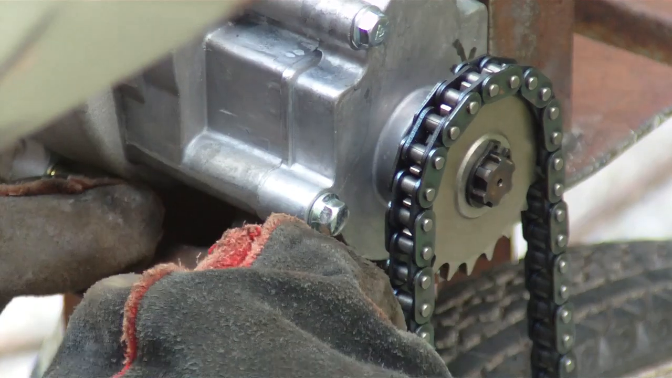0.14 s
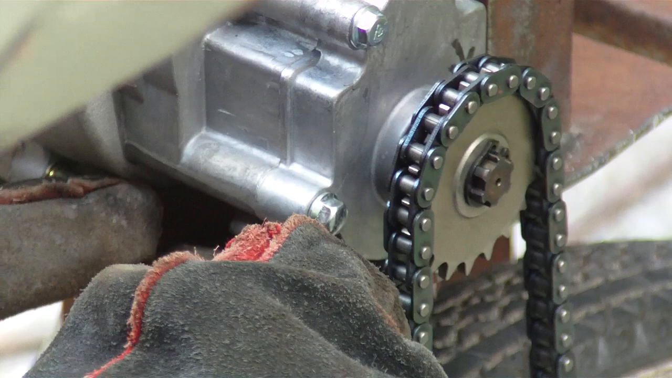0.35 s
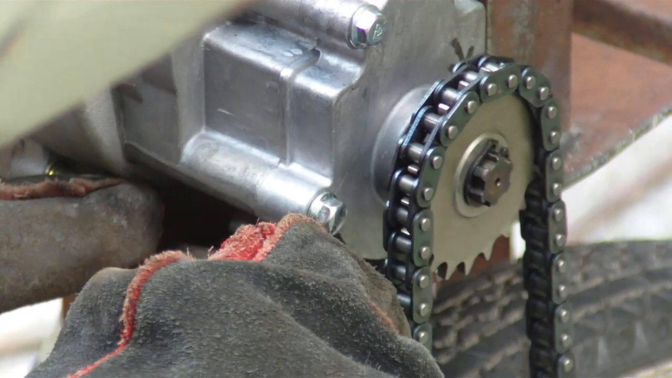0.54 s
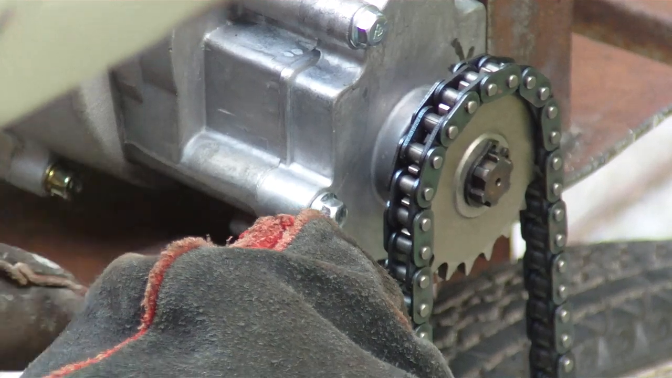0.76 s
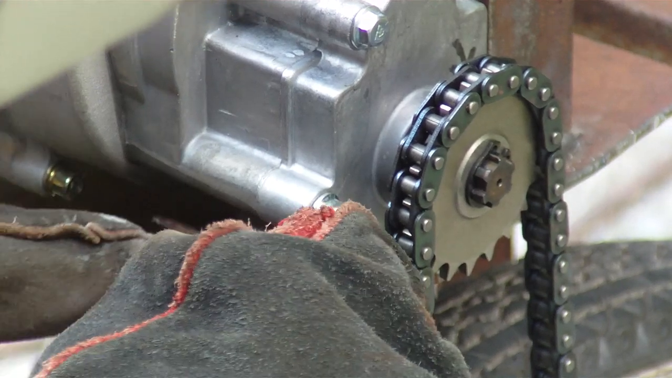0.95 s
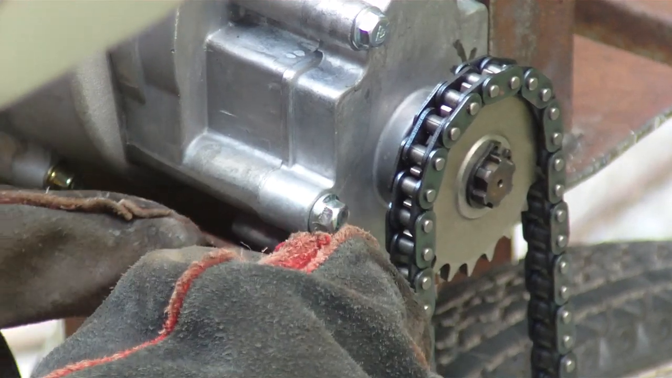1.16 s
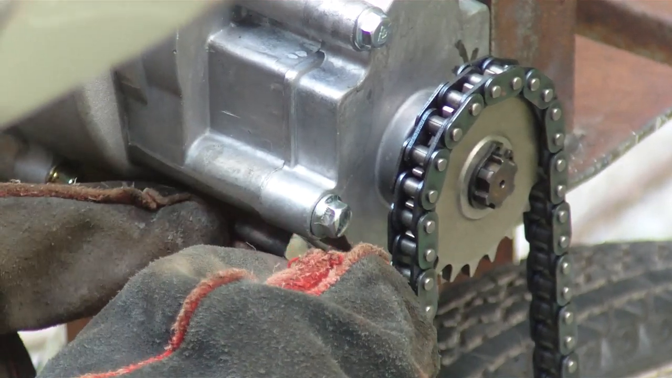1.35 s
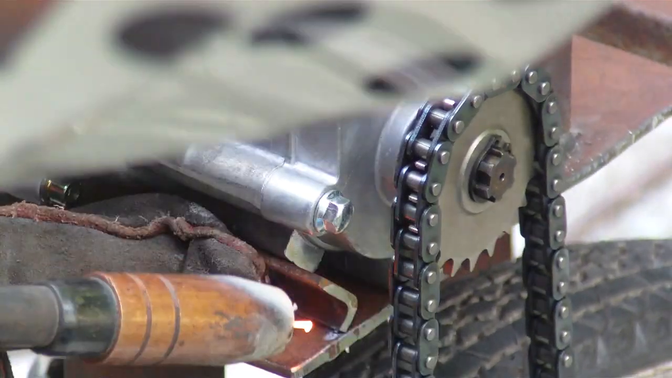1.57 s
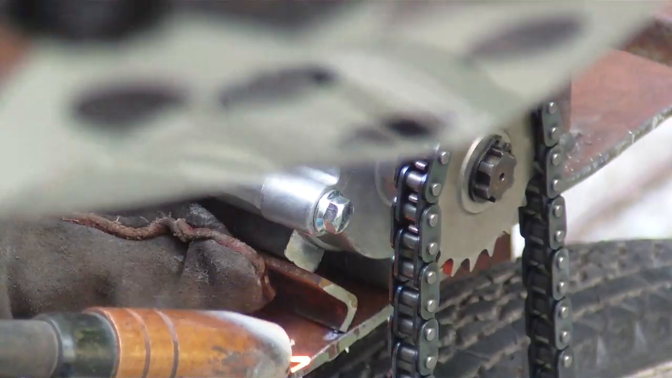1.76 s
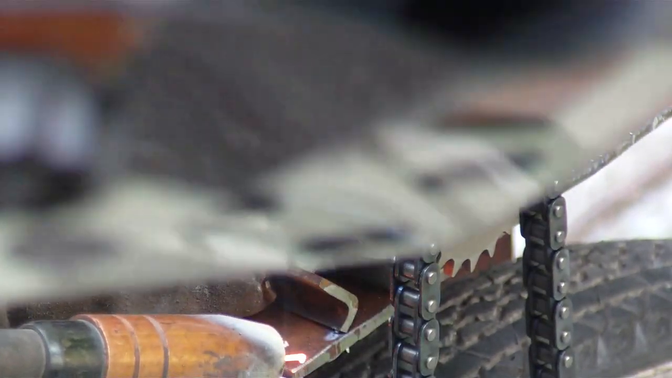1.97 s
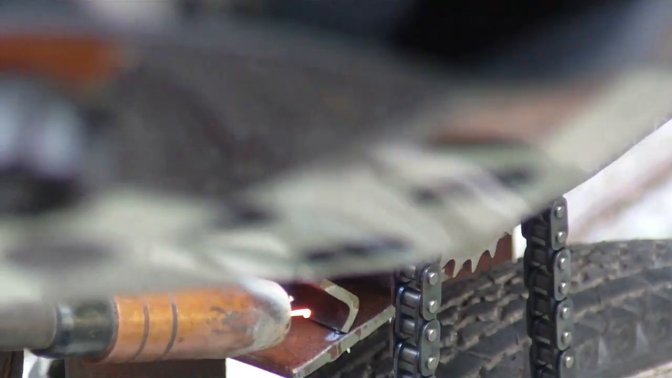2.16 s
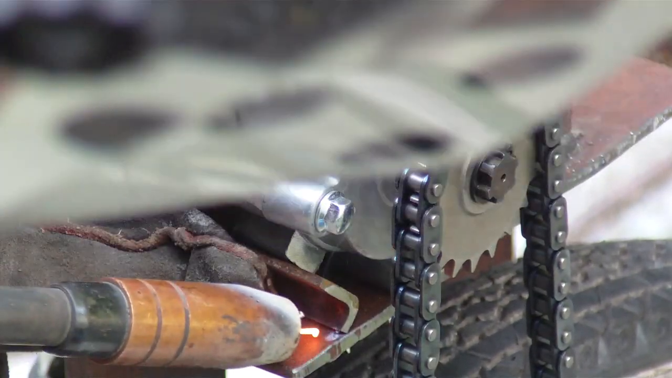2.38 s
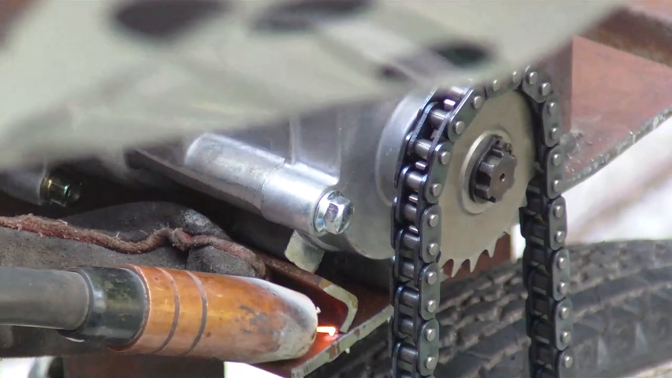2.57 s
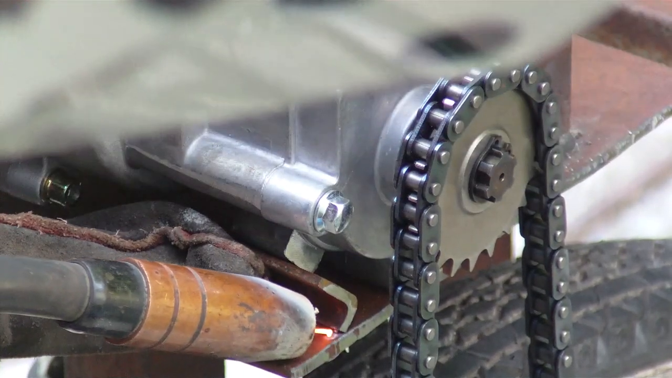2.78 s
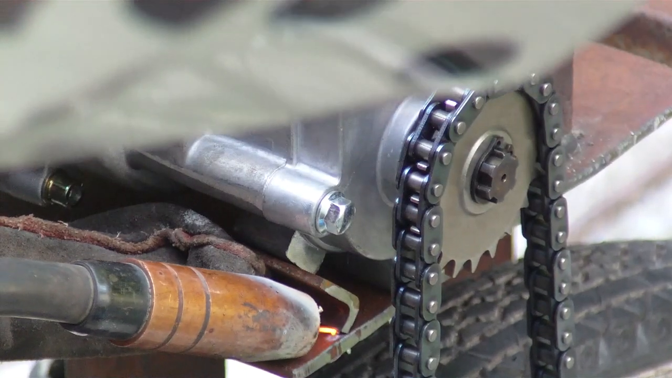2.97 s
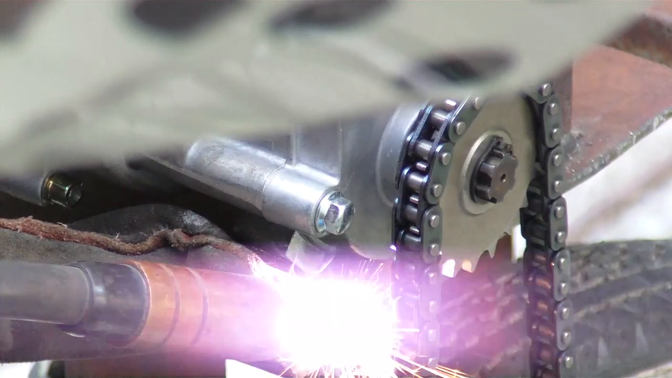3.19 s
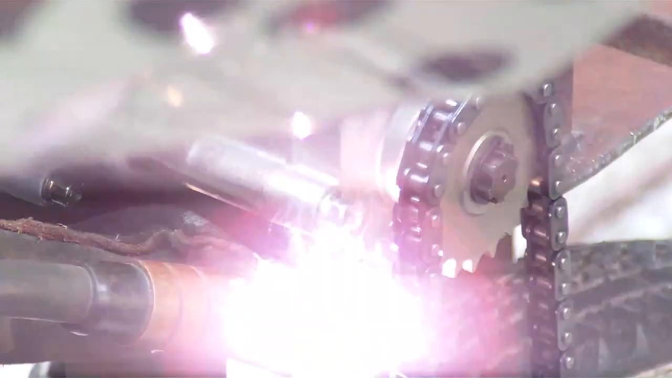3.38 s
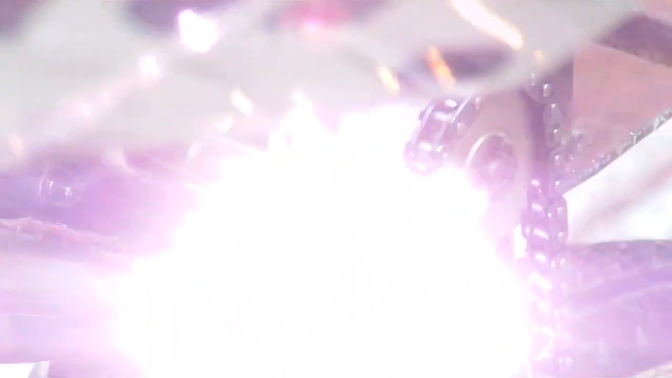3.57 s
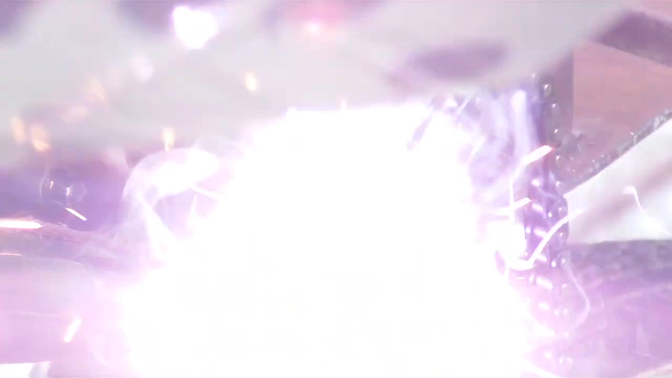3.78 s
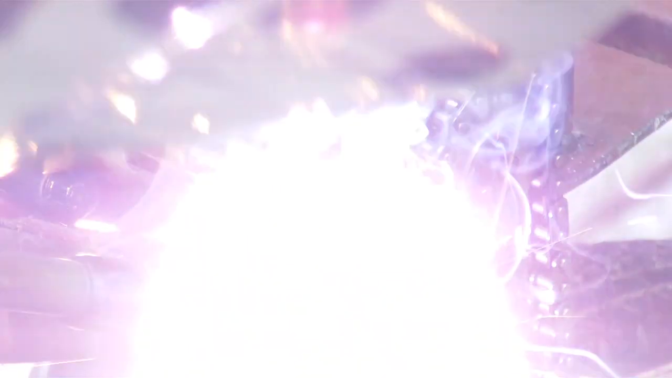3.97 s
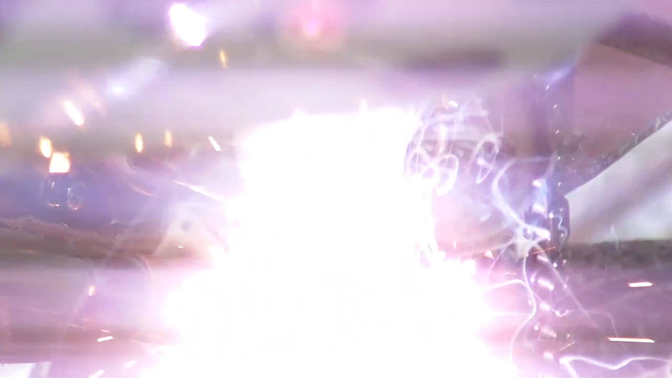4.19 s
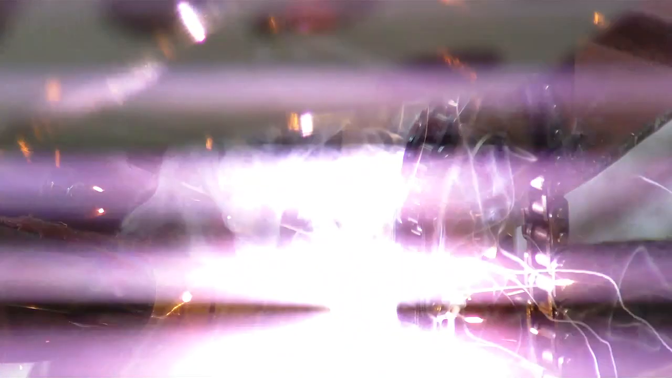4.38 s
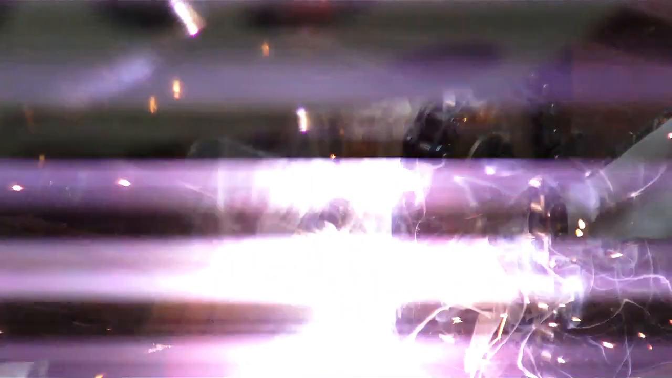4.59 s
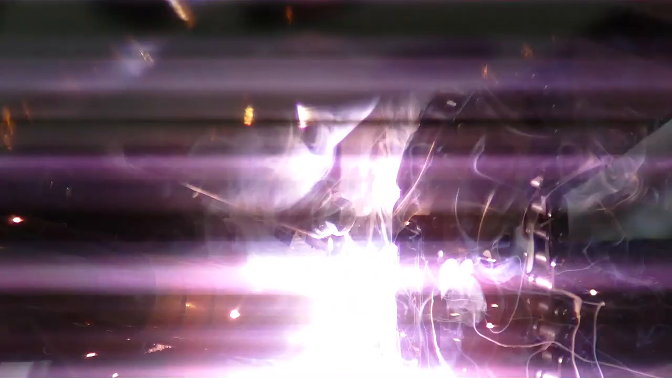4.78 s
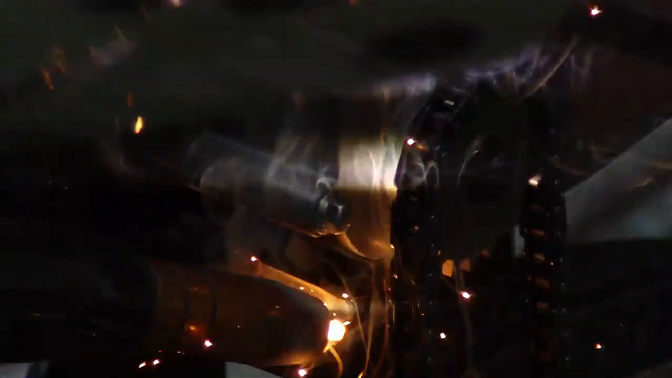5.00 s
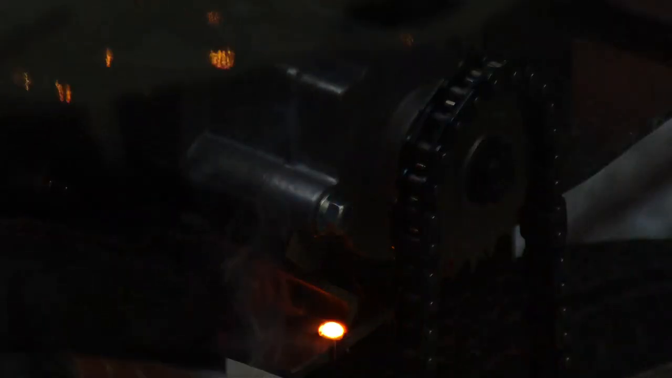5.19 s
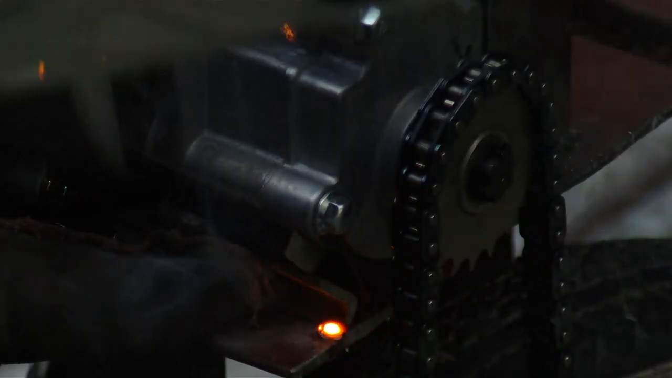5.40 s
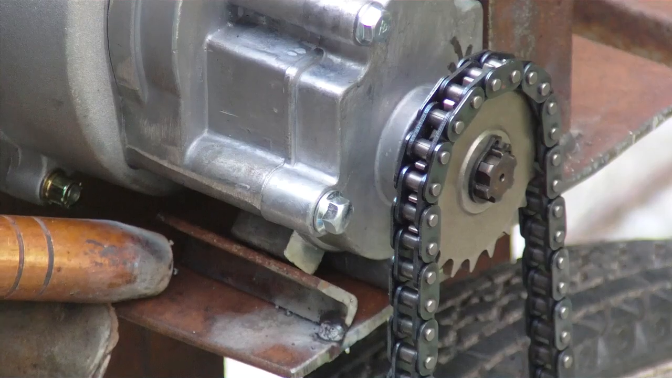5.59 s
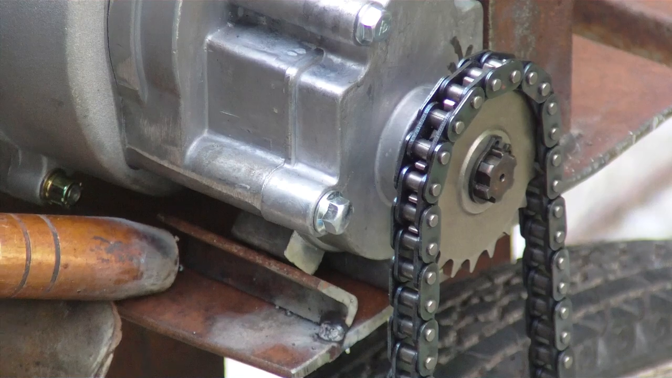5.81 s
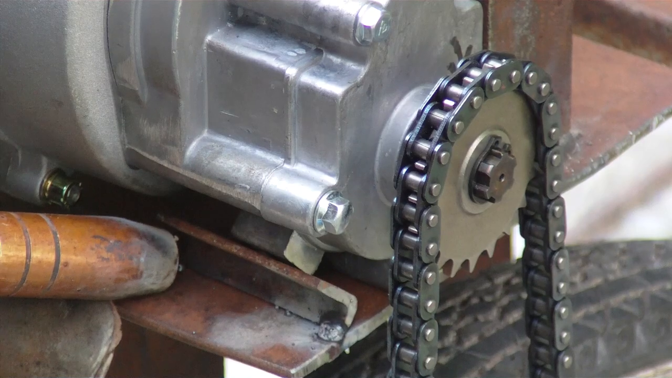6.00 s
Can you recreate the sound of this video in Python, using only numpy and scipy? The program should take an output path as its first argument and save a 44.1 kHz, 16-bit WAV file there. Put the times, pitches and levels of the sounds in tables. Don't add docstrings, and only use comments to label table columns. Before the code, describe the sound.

Close to the work, soft background noise and high insect trills surround faint handling ticks, one sharp ringing metal clink and a later short, dull knock. Wire sputters irregularly against cold steel, then the arc ignites with a hard crack and burns with rasping buzz, bright sizzle and ragged pops echoing off nearby metal. The arc stops abruptly, leaving thin hissing gas, cooling spits, then the calm shed and crickets.

```python
import sys
import numpy as np
from scipy import signal
from scipy.fft import rfft, irfft
from scipy.io import wavfile
from scipy.ndimage import uniform_filter1d

SR = 44100
rng = np.random.default_rng(int(sys.argv[2]) if len(sys.argv) > 2 else 0)


def natural_amplitude(level_db):
    exponent = np.asarray(level_db, float) / 20
    return 10 ** exponent


def materialize(psi):
    bounded = np.clip(np.atleast_2d(psi).T, -1, 1)
    quanta = np.round(bounded * 32767).astype(np.int16)
    wavfile.write(sys.argv[1], SR, quanta)


N = 266805
TIME = np.arange(N) / SR

# (frequency [Hz], density [dB per Hz])
SHED_SPECTRUM = [(18, -30.5), (30, -15.5), (194, -14.5), (259, 1), (303, -10.5), (328, -15.5), (486, -4.5),
                 (616, -9.5), (760, -10), (3770, -21.5), (6550, -23.5), (7470, -19), (16000, -37)]
# (time [s], level [dB])
SHED_LEVEL = [(0, -62.5), (1.55, -63), (1.65, -64), (3.2, -63.5), (5.35, -64.5), (5.45, -62), (6.05, -63)]
# (frequency [Hz], width [Hz], level [dB])
DRONES = [(268, 38, -74.5), (334.5, 6.7, -76.5), (509, 103, -72.5), (5400, 1300, -74.5), (7400, 15, -84),
          (7930, 1300, -74), (11770, 3200, -78.5), (14500, 2600, -78.5)]
# (time [s], level [dB])
WHINE = [(0, -90), (1.8, -88), (1.9, -84), (6.05, -80)]
# (time [s], pitch [Hz], level [dB])
FEEDER = [
    (3.25, 301, -90),
    (3.265, 288, -56),
    (3.3, 245, -56),
    (3.34, 230, -58),
    (3.4, 242.6, -66),
    (5.05, 236, -64),
    (5.2, 247.6, -60),
    (5.4, 262, -62),
    (5.46, 266, -90),
]
# (first chirp [s], period [s], tiring [s], peak level [dB], pitch [Hz])
TRILLS = [
    (.04, .0631, 0, -58, 7570),
    (1.6217, .0675, .068, -61.5, 7390),
    (5.441, .0635, .01, -56.5, 7630),
]
CHIRP_COUNTS = [23, 18, 10]
# (time [s], level [dB], pitch [Hz])
CHIRP_SPREAD = [.002, 1.5, 40]
# (time [s], peak level [dB])
KNOCKS = [
    (0.149, -48.5),
    (2.31, -28.5),
    (2.4476, -53),
]
# (frequency [Hz], level [dB], T60 [s])
PLATE = [(1432, -13.5, 0.032), (1780, -35, 0.06), (3130, -5, 0.035), (4280, -6, 0.038), (5370, -4.5, 0.029),
         (5800, -15, 0.075), (6470, -18, 0.053), (7000, -23, 0.11), (7224, -43, 0.16), (9200, -25, 0.071)]
# (time [s], peak level [dB])
CLINK = [
    (0.8657, -9.5),
]
# (frequency [Hz], level [dB], T60 [s])
BRACKET = [(1120, -26, .04), (1500, -25, .04), (1780, -22, .05), (2100, -20, .04), (2557, -23, .11),
           (3429, -22, .19), (3520, -27, .15), (3900, -16, .03), (4330, -11, .04), (5225, -13, .08),
           (5346, -6, .08), (5846, -12, .093), (5922, -18, .11), (6175, -22, .15), (6260, -30, .24),
           (6444, -28, .12), (6912, -24, .12), (7219, -1, .045), (7354, -5, .065), (7827, -20, .077),
           (8280, -25, .094), (9523, -27, .22), (10970, -20, .048), (2505, -17, .06)]
# (time [s], peak level [dB])
TICKS = [(1.3039, -52), (1.4027, -59), (1.734, -53), (1.8342, -54), (2.2303, -51.5), (2.4484, -55),
         (2.4484, -49), (2.5431, -49), (2.5744, -51), (2.5987, -50), (2.6144, -58), (2.802, -55)]
# (time [s], peak level [dB])
CONTACTOR = [
    (3.262, -44),
]
# (time [s], level [dB])
GAS = [
    (3.25, -95),
    (3.35, -62.5),
    (3.42, -54),
    (5.08, -50.5),
    (5.2, -63),
    (5.26, -63.5),
    (5.42, -63),
    (5.47, -79),
]
# (time [s], peak level [dB])
VALVE = [
    (3.258, -35),
    (3.287, -41),
    (3.334, -42),
]
# (time [s], level [dB])
ARC = [
    (3.402, -49.5),
    (3.45, -39.5),
    (3.53, -39.5),
    (3.57, -27),
    (4.27, -27),
    (4.35, -31.5),
    (5.02, -30),
    (5.07, -42),
    (5.12, -63),
]
# (time [s], width [s], change [dB])
SURGES = [
    (3.862, 0.081, -3.5),
    (4.18, 0.074, 1.5),
    (4.582, 0.049, 3.5),
    (4.73, 0.04, 6),
    (4.98, 0.078, 2.5),
    (5.235, 0.0087, 10.5),
]
# (time [s], peak level [dB], low thump re peak [dB], top
# octave re peak [dB])
STUTTERS = [(3.2575, -37, -2, 10), (3.2811, -40, -19.5, 3), (3.2875, -16.5, -15, 1.5),
            (3.3328, -5, -19, 3.5), (3.405, -33, -18, 3), (3.4138, -27.5, -29, -5.5), (3.431, -29, -15, -8),
            (3.4478, -21, -17, -18.5), (3.4557, -21, -10.5, -10), (3.4662, -12.5, -18.5, -11),
            (3.4659, 1, -55.5, -7.5), (3.4888, -24, -31.5, -7), (3.5066, -12.5, -15, -15.5),
            (3.5141, -14.5, -39, 0.5), (3.5531, -7.5, -19, -7), (3.5627, -1, -20, -20),
            (3.4648, 1, -22, -10),
]
# (time [s], peak level [dB], low thump re peak [dB], top octave re peak [dB])
BURSTS = [(3.5966, -2, -18.5, -7.5), (3.6538, -1, -20.5, -9), (3.7135, -11.5, -12, -9),
          (3.7287, -8.5, -42, -0.5), (3.7553, -3, -22, -8), (3.7801, 0, -21.5, -9),
          (3.8045, -0.5, -19.5, -14), (3.905, 0.5, -28, -15), (3.9786, -1, -16.5, -11),
          (4.0458, -3, -21.5, -8), (4.1044, -1.5, -21, -9), (4.122, 2.5, -30, -11), (4.163, -4.5, -39, -29),
          (4.1888, -5, -19.5, -4.5), (4.1965, 1, -19, -12), (4.2367, -4, -21, -12),
          (4.2625, -5.5, -27, -11), (4.289, 0, -16.5, -6.5), (4.7885, -4.5, -40, -9),
          (4.4462, -12, -12, -4), (4.464, -7, -19, -2), (4.5812, -14.5, -6, 8), (4.6806, -4.5, -14.5, -2.5),
          (4.7386, -2.5, -20, -9), (4.747, -8, -30, -10), (4.8382, -3.5, -24, -20),
          (4.8728, 1, -27.5, -9.5), (4.9326, -11, -25, -17.5), (5.0054, -8, -27, -10), (5.047, -17, -11, 2)]
# (time [s], peak level [dB], low thump re peak [dB], top octave re peak [dB])
SPITS = [
    (5.0798, -41, -24, -10.5),
    (5.0953, -28.5, -9, -10),
    (5.1319, -37.5, -6, 2),
    (5.164, -36.5, -41, 3),
    (5.2009, -35.5, -35, 1),
    (5.2678, -39, -18, -8.5),
]
# (frequency [Hz], width [Hz], level [dB])
CORNER = [(851, 480, -13), (1803, 250, -6), (2574, 590, -10), (4397, 686, -1), (5790, 814, 1),
          (7830, 200, -4.5), (8350, 94, 1), (9200, 760, -3.5)]
# (frequency [Hz], width [Hz], level [dB])
CORNER_TOP = [(10160, 800, -4.5), (11910, 1400, -2), (12800, 1880, 0), (14300, 2500, -5)]
# (delay [ms], gain [dB])
ECHOES = [(.33, -20.5), (1.9, -31), (3.25, -12.5), (3.7, -35.5), (6.4, -19)]
# (time [s], length [s], depth [dB])
DROPOUTS = [(1.458, .022, -18), (1.992, .022, -18), (2.293, .016, -25), (2.78, .02, -15), (4.317, .012, -9),
            (4.382, .014, -10), (4.81, .014, -9), (4.91, .014, -10), (5.025, .016, -14), (5.212, .016, -18),
            (5.328, .026, -32)]
SPARED_HZ = [1900, 4400, 5100, 5800, 7500, 8500, 9300, 10300, 11700, 13500, 14300]

RIPPLE_HZ, RIPPLE_CREST_S = 119.93, 4.2979


def rms_one(x):
    return x / np.sqrt(np.mean(x ** 2) + 1e-20)


def in_time(rows):
    s, *columns = np.transpose(rows)
    return [np.interp(TIME, s, c) for c in columns]


def clicks(rows, extra_db):
    out, rows = np.full(N, 1e-18), np.array(rows)
    out[(rows[:, 0] * SR).astype(int)] = natural_amplitude(rows[:, 1] + extra_db)
    return out


def resonance(x, hz, width_hz):
    r = np.exp(-np.pi * width_hz / SR)
    zeros = np.array([1, 0, -1]) * (1 - r * r) / 2
    return signal.lfilter(zeros, [1, -2 * r * np.cos(2 * np.pi * hz / SR), r * r], x)


def narrow_band(x, hz, width_hz):
    return resonance(resonance(x, hz, width_hz), hz, width_hz)


def band(x, low_hz, high_hz):
    return signal.sosfilt(signal.butter(2, [low_hz, high_hz], "band", fs=SR, output="sos"), x)


def decay(t60):
    t = np.arange(SR // 3) / SR
    return rng.standard_normal(len(t)) * natural_amplitude(-60 * t / t60)


def fading(x, t60):
    r = natural_amplitude(-60 / (t60 * SR))
    return signal.lfilter([1 - r], [1, -r], x)


def corner(x, modes):
    return sum(natural_amplitude(db) * (-1) ** k * resonance(x, hz, width) for k, (hz, width, db) in enumerate(modes))


def struck(events, modes, ring_db, crack_db, crack_t60, low_hz, high_hz):
    t, blows = np.arange(SR // 3) / SR, clicks(events, extra_db=2.5)
    ring = 0
    for k, (hz, db, t60) in enumerate(modes):
        ring = ring + natural_amplitude(db - 60 * t / t60) * np.sin(2 * np.pi * hz * t) * (-1) ** k
    crack = decay(crack_t60) + natural_amplitude(-23) * decay(0.24)
    crack = band(band(crack, low_hz, high_hz), low_hz, high_hz)
    return signal.fftconvolve(blows, natural_amplitude(ring_db) * ring + natural_amplitude(crack_db) * crack)[:N]


def shed():
    hz, points = np.maximum(np.fft.rfftfreq(N, 1 / SR), 10), np.array(SHED_SPECTRUM)
    spectrum_db = np.interp(np.log(hz), np.log(points[:, 0]), points[:, 1])
    floor = irfft(rfft(rng.standard_normal(N)) * natural_amplitude(spectrum_db), N)
    drones = sum(natural_amplitude(db) * rms_one(narrow_band(rng.standard_normal(N), f, width)) for f, width, db in DRONES)
    whine = natural_amplitude(in_time(WHINE)[0]) * np.sin(2 * np.pi * 7882 * TIME)
    return natural_amplitude(in_time(SHED_LEVEL)[0]) * rms_one(floor) + drones + whine


def rumble():
    gusts = natural_amplitude(2.1 * rms_one(band(rng.standard_normal(N), 3.7, 3.8)))
    return natural_amplitude(-68.5) * gusts * rms_one(band(rng.standard_normal(N), 3.5, 30))


def bumps():
    per_s, bump_s = 12, .025
    born = (rng.random(N) < per_s / SR) * rng.exponential(1, N)
    lumps = rms_one(fading(fading(born + 1e-18, 5 * bump_s), 5 * bump_s))
    return natural_amplitude(-77) * lumps * rms_one(band(rng.standard_normal(N), 13, 80))


def chirps():
    rows = []
    for (s, period, tiring, db, hz), count in zip(TRILLS, CHIRP_COUNTS):
        for k in range(count):
            late = tiring * (k / (count - 1)) ** 4
            rows.append((s + k * period + late, db, hz))
    return rows + rng.standard_normal((len(rows), 3)) * CHIRP_SPREAD


def crickets():
    out, t = np.zeros(N + SR), np.arange(SR // 20) / SR
    shape = t / 0.0061 * np.exp(1 - t / 0.0072)
    for s, db, hz in chirps():
        flutter = uniform_filter1d(rng.standard_normal(len(t)), size=100) * 10
        rough = 1 + 0.25 * np.cos(2 * np.pi * 64 * t) + 0.41 * flutter
        tone = np.sin(2 * np.pi * (hz * t - 1500 * t * t))
        out[int(s * SR):][:len(t)] += natural_amplitude(db - 5.5) * shape * rough * tone
    return out[:N]


def nozzle_knocks():
    return struck(KNOCKS, PLATE, ring_db=-2.0, crack_db=0.5, crack_t60=0.025, low_hz=1140, high_hz=7500)


def tool_clink():
    return struck(CLINK, BRACKET, ring_db=-7.0, crack_db=-5.5, crack_t60=0.036, low_hz=3200, high_hz=11100)


def handling():
    ticks = signal.fftconvolve(clicks(TICKS, extra_db=0.5), band(decay(0.078), 780, 3100))[:N]
    thud = signal.fftconvolve(clicks(CLINK, extra_db=-23), band(decay(0.043), 80, 2600))[:N]
    relay = signal.fftconvolve(clicks(CONTACTOR, extra_db=2), band(decay(0.18), 150, 3000))[:N]
    return ticks + thud + relay


def feeder():
    pitch_hz, level_db = in_time(FEEDER)
    return natural_amplitude(level_db) * np.sin(2 * np.pi * np.cumsum(pitch_hz) / SR)


def gas():
    born = (rng.random(N) < 150 / SR) * rng.exponential(22, N) * (TIME > 5.05)
    spits = 1 + fading(born, .003)
    jet = corner(spits * rng.standard_normal(N), [(8700, 2300, -1.5), (12600, 3500, -4), (4980, 4400, -11)])
    valve = 0
    for s, db in VALVE:
        age = np.abs(TIME - s)
        spit = natural_amplitude(db - 60 * age / 0.045)
        tail = natural_amplitude(db - 16.5 - 60 * age / .2)
        valve = valve + (TIME > s) * (spit + tail)
    return (natural_amplitude(in_time(GAS)[0]) + valve) * rms_one(jet)


def burn():
    surges_db = sum(db * np.exp(-((TIME - s) / width) ** 2) for s, width, db in SURGES)
    level_db = in_time(ARC)[0] + surges_db
    full_burn_db = -23.5
    return level_db, -4.5 - 0.46 * np.clip(level_db - full_burn_db, -6.0, 3.0)


def pops(sizzle_db, top_db):
    from_s, to_s = 3.568, 5.01
    lead, jitter = .1, .08
    chance, luck = rng.random(200), np.clip(rng.standard_normal((200, 4)), -1.8, 1.8)
    first = np.ceil((from_s - RIPPLE_CREST_S) * RIPPLE_HZ)
    s = RIPPLE_CREST_S + (first + np.arange(200) - lead + jitter * luck[:, 0]) / RIPPLE_HZ
    at = (s * SR).astype(int)
    free = np.abs(s[:, None] - np.array(BURSTS)[:, 0]).min(axis=1) > .5 / RIPPLE_HZ
    peak_db = sizzle_db[at] + 17 + 2.5 * luck[:, 1]
    low_db = -28 + 6.0 * luck[:, 2]
    high_db = -5.5 + top_db[at] + 3.5 * luck[:, 3]
    rows = np.transpose([s, peak_db, low_db, high_db])
    return rows[(chance < .65) & free & (s < to_s)]


def plasma(sizzle_db):
    cycles = (TIME - RIPPLE_CREST_S) * RIPPLE_HZ
    crest = .5 + .5 * np.cos(2 * np.pi * cycles)
    whole = np.arange(cycles[0] // 1, cycles[-1] + 2)
    strength_db = np.interp(cycles, whole, 2.8 * rng.standard_normal(len(whole)))
    sizzle = rng.standard_normal(N) * (.35 + crest ** 2) * natural_amplitude(strength_db)
    born = rng.random(N) < 900 * crest ** 3 / SR
    grains = born * natural_amplitude(2.6 * np.minimum(rng.exponential(1, N), 4)) * rng.choice([-1, 1], N)
    burning = (TIME > ARC[0][0]) & (TIME < 5.3)
    return burning * (natural_amplitude(sizzle_db + 4) * rms_one(sizzle) + natural_amplitude(sizzle_db - 1.5) * rms_one(grains))


def surroundings(x):
    return x + sum(natural_amplitude(db) * np.roll(x, int(ms * SR / 1000)) for ms, db in ECHOES)


def scattered(x):
    machinery = natural_amplitude(2 * -6.5) * fading(x * x, .03 / 2)
    walls = natural_amplitude(2 * -26) * fading(x * x, .16 / 2)
    return rng.standard_normal(N) * np.sqrt(np.maximum(machinery + walls, 0))


def arc():
    sizzle_db, top_db = burn()
    fizz = plasma(sizzle_db)
    ragged = rng.choice([-1, 1], N)
    bursts = np.vstack([STUTTERS, BURSTS, SPITS, pops(sizzle_db, top_db)])
    low_db, high_db = bursts[:, 2:].T
    crackle = ragged * fading(clicks(bursts, extra_db=23), 0.0026)
    snap = clicks(bursts, extra_db=13)
    body = fizz + band(crackle - snap, 2800, 10000)
    top_crackle = ragged * fading(clicks(bursts, extra_db=high_db + 26), 0.00278)
    top_snap = clicks(bursts, extra_db=high_db + 18)
    top = natural_amplitude(top_db) * fizz + top_crackle + top_snap
    body, top = surroundings(body), surroundings(top)
    thumps = band(surroundings(-clicks(bursts, extra_db=low_db + 18.5)), 32, 2600)
    return corner(body + scattered(body), CORNER) + corner(top + scattered(top), CORNER_TOP) + thumps


def scene():
    background = shed() + rumble() + bumps() + crickets()
    work = nozzle_knocks() + tool_clink() + handling()
    welder = feeder() + gas() + arc()
    return (background + work + welder)[None]


def roll_off(x):
    return signal.sosfilt(signal.butter(12, 17020, fs=SR, output="sos"), x)


def record(dry):
    treble = signal.sosfiltfilt(signal.butter(2, 900, "high", fs=SR, output="sos"), dry)
    dip_db = sum(db * (np.abs(TIME - s) < length / 2) for s, length, db in DROPOUTS)
    spared = 1.7 * sum(narrow_band(treble, hz, 170) for hz in SPARED_HZ)
    x = dry + (treble - spared) * (natural_amplitude(uniform_filter1d(dip_db, size=150)) - 1)
    cut = signal.sosfiltfilt(signal.ellip(8, .3, 35, 15780, fs=SR, output="sos"), x)
    wide = signal.sosfiltfilt(signal.ellip(8, .3, 40, 16600, fs=SR, output="sos"), x)
    hard = np.minimum(1, 100 * uniform_filter1d(1. * (np.abs(cut) > .6), size=100))
    x = cut + natural_amplitude(-6.0) * uniform_filter1d(hard, size=60) * (wide - cut)
    return roll_off(np.clip(x, -1, 1))


dry = scene()
out = record(dry)
materialize(out)
```